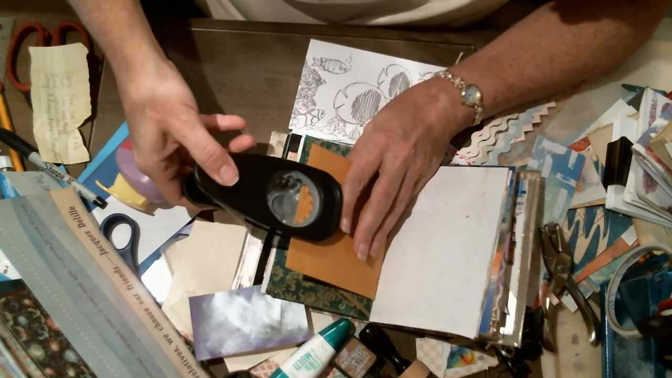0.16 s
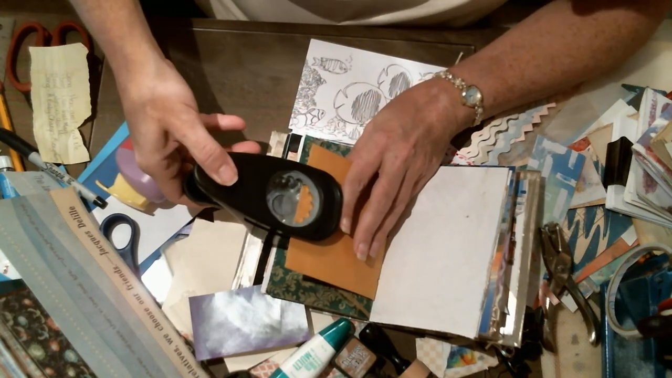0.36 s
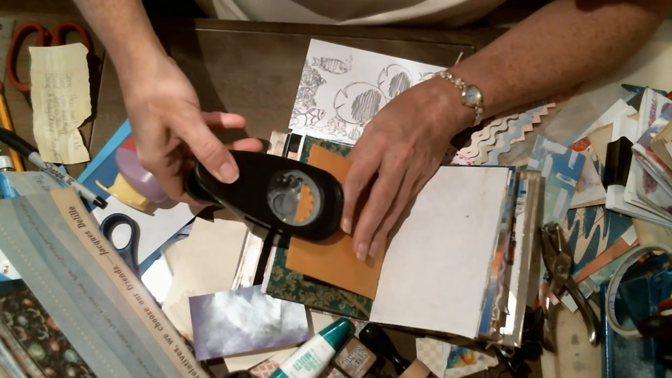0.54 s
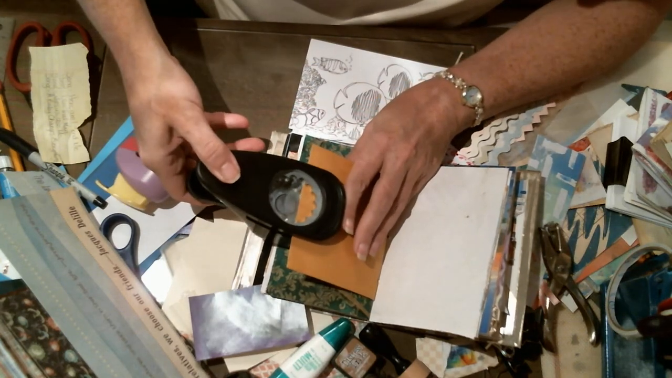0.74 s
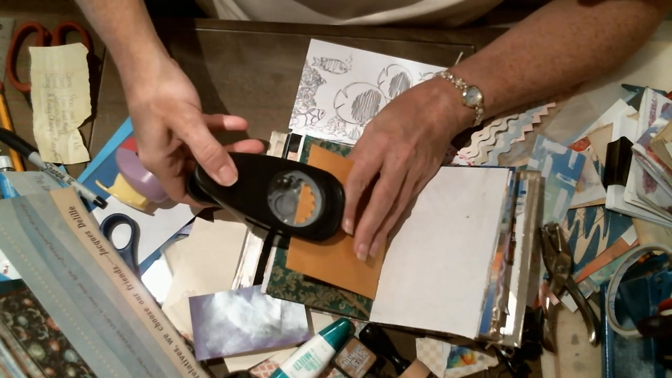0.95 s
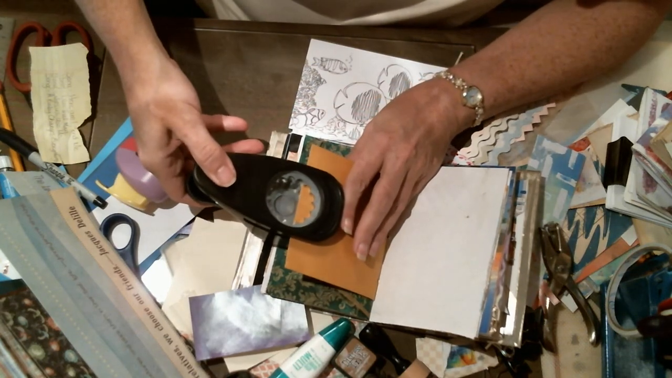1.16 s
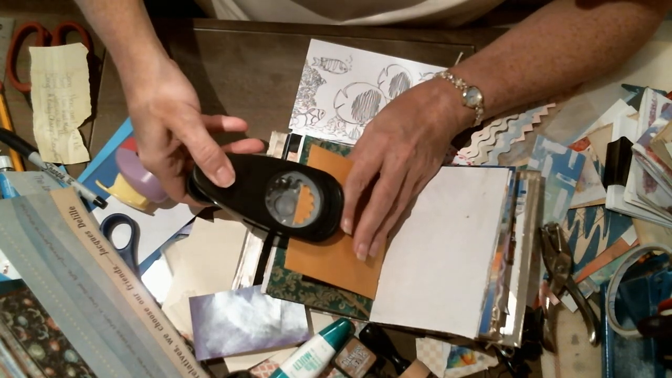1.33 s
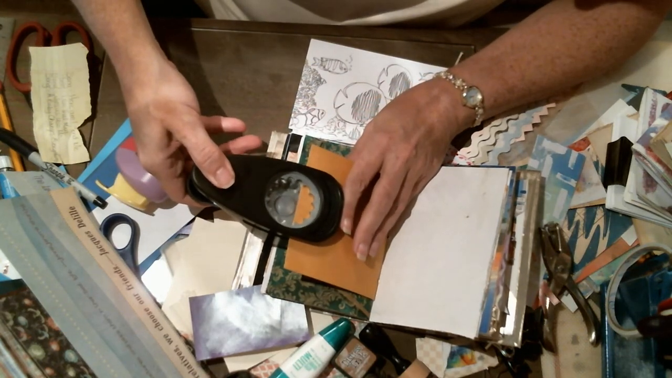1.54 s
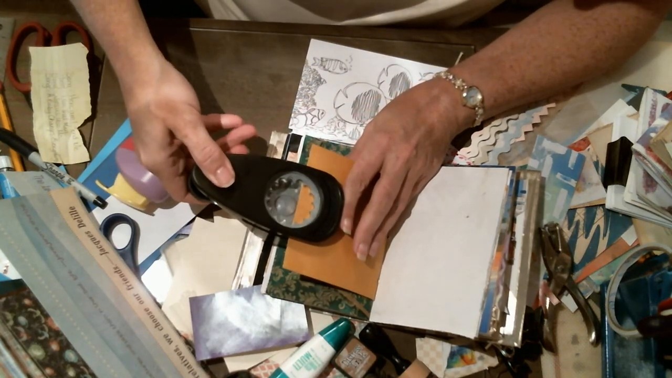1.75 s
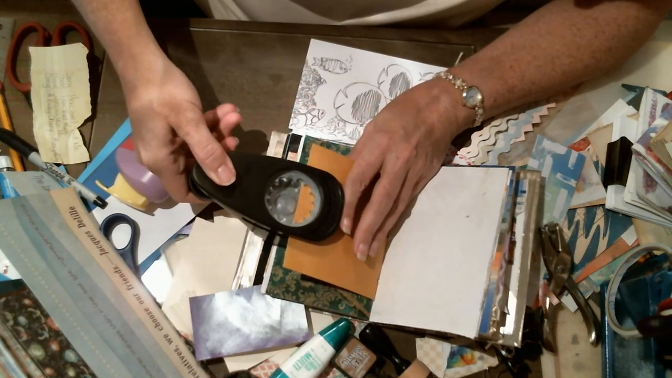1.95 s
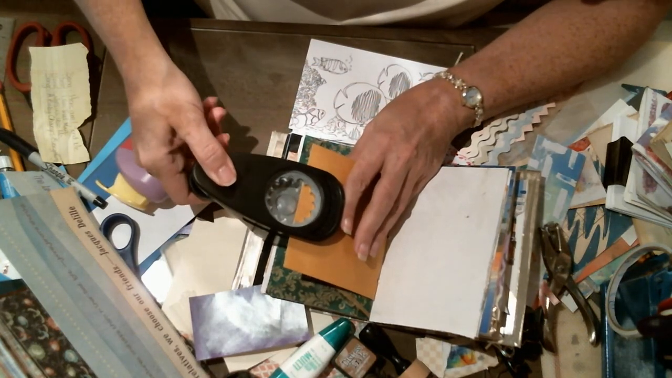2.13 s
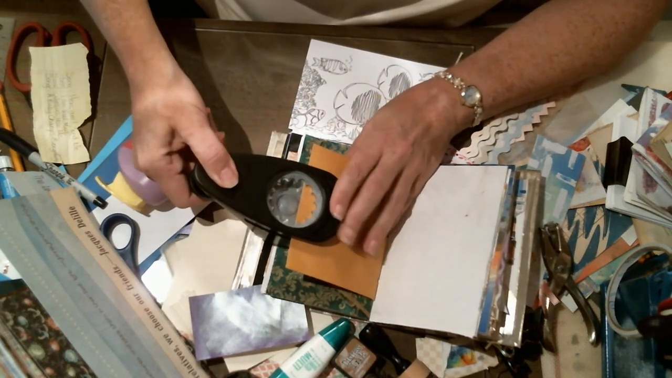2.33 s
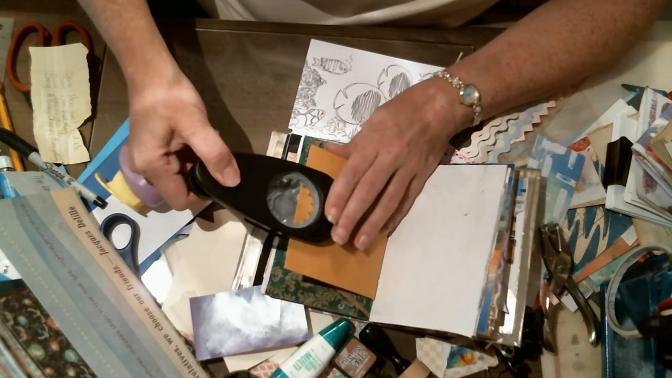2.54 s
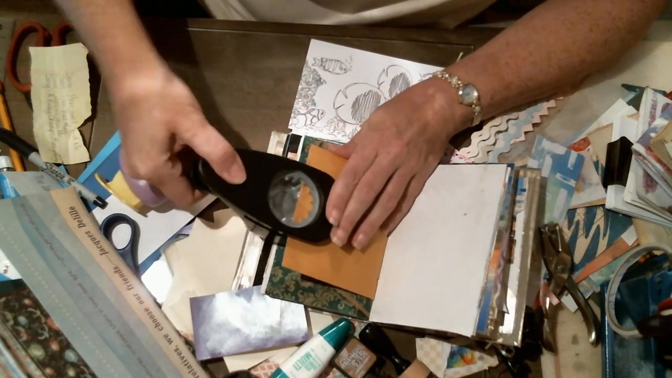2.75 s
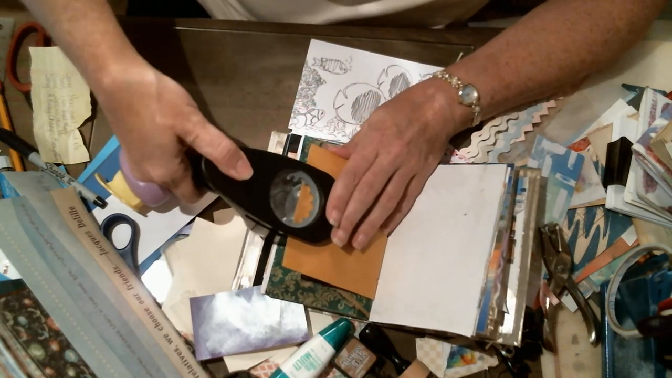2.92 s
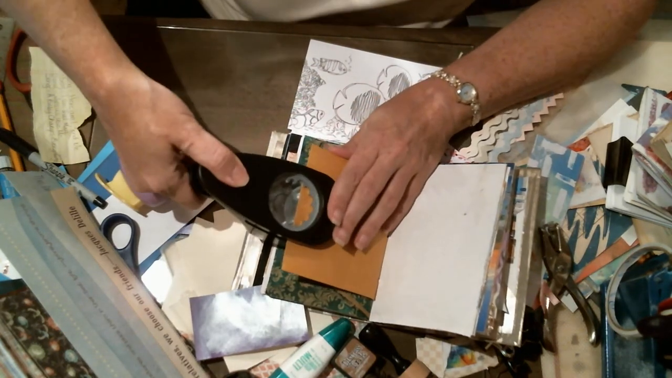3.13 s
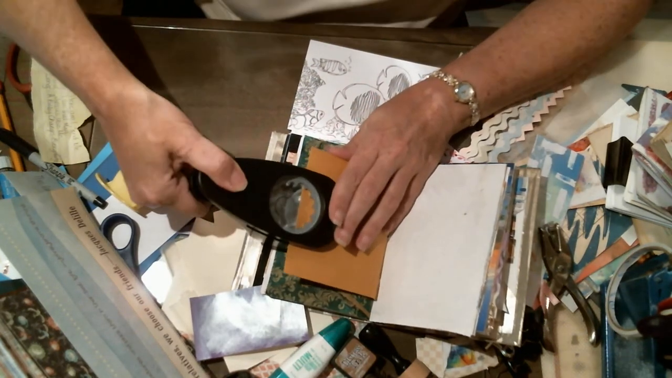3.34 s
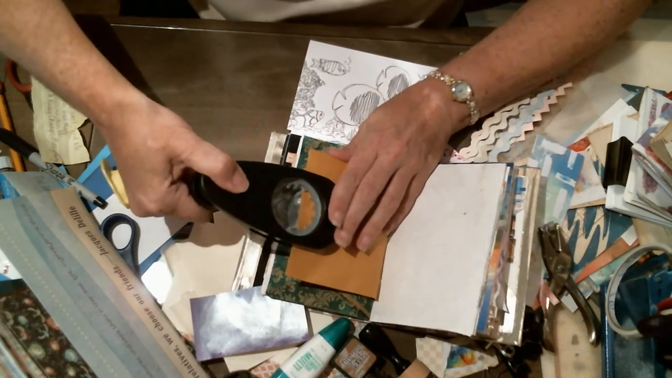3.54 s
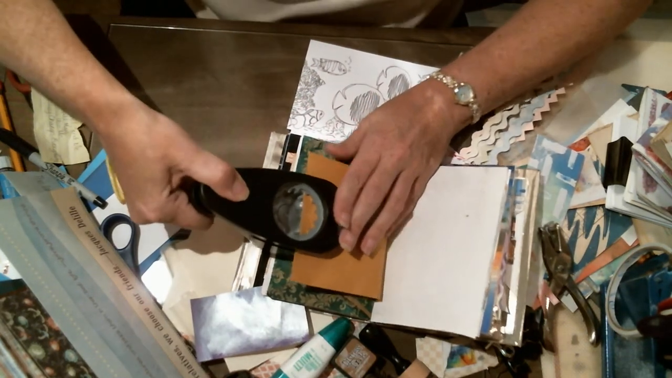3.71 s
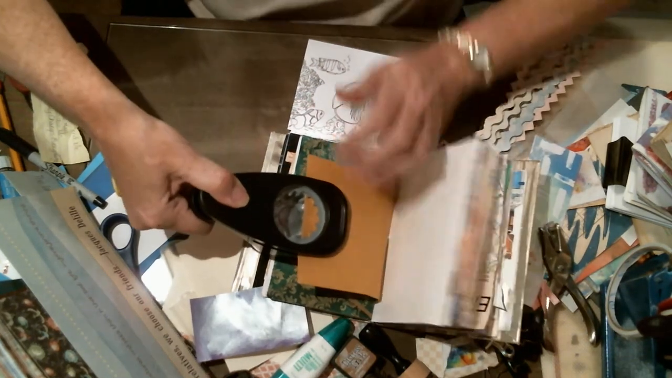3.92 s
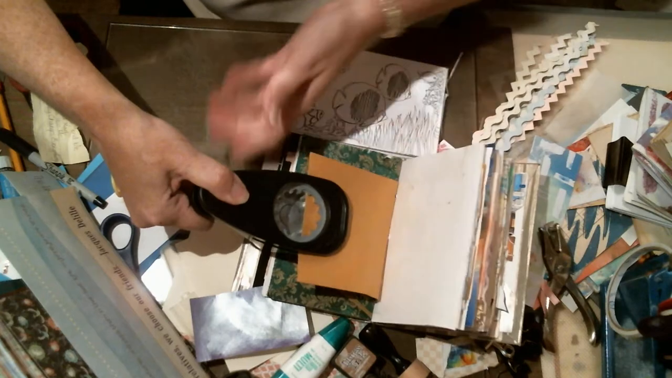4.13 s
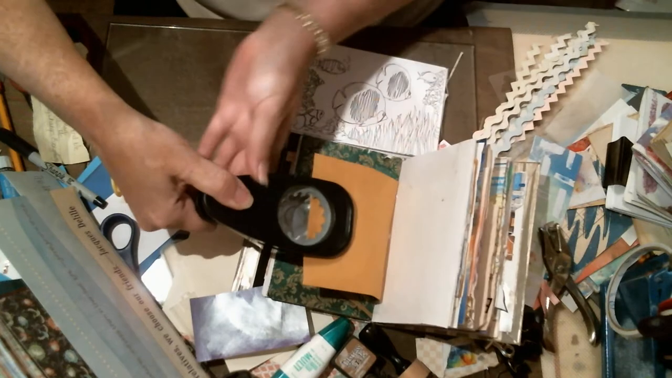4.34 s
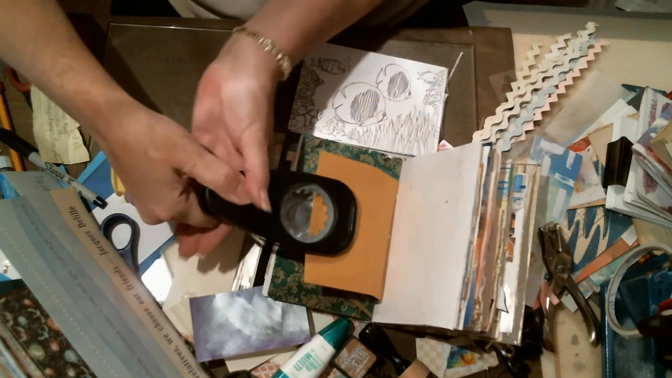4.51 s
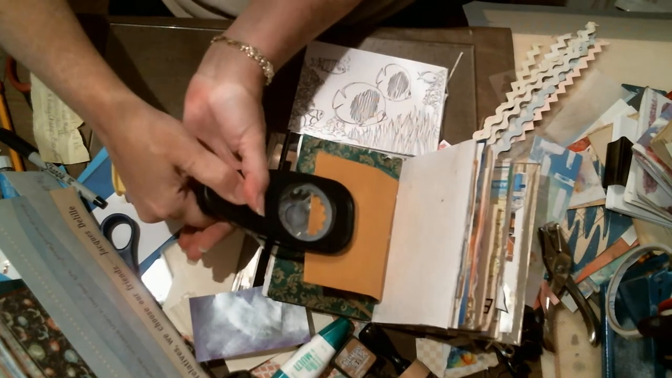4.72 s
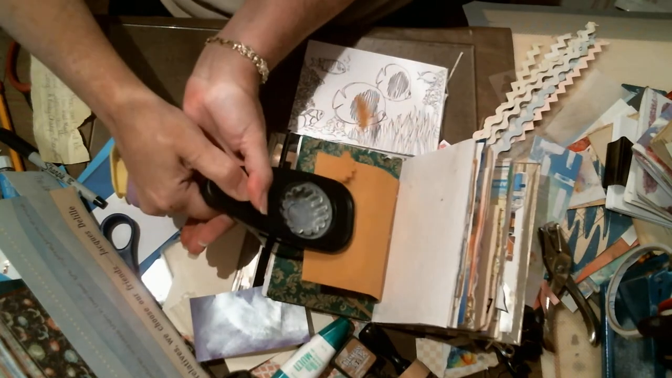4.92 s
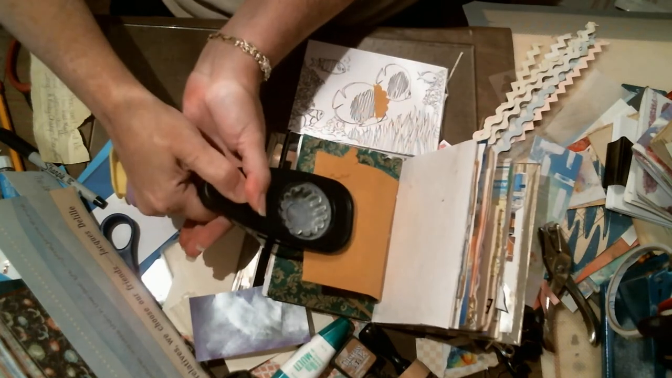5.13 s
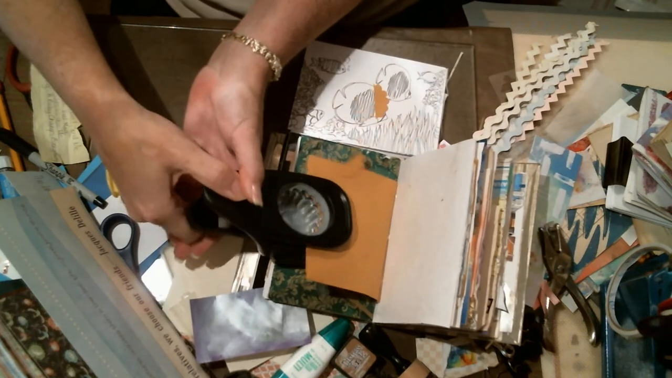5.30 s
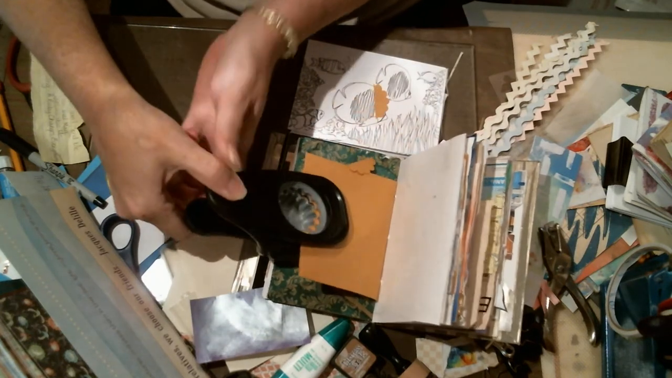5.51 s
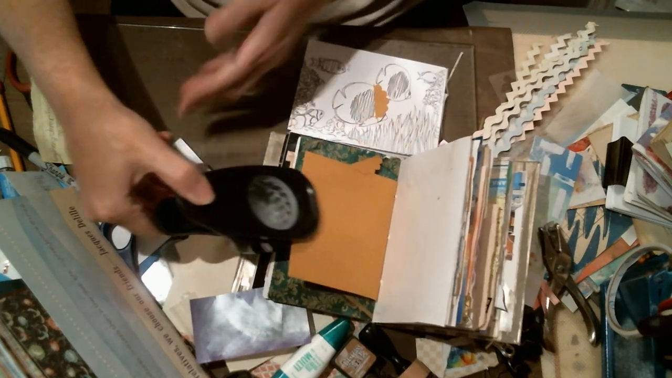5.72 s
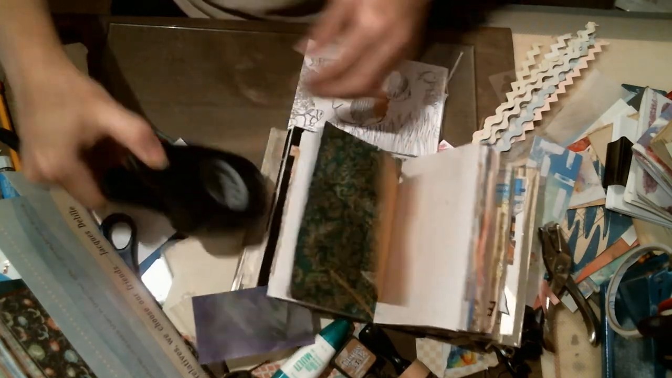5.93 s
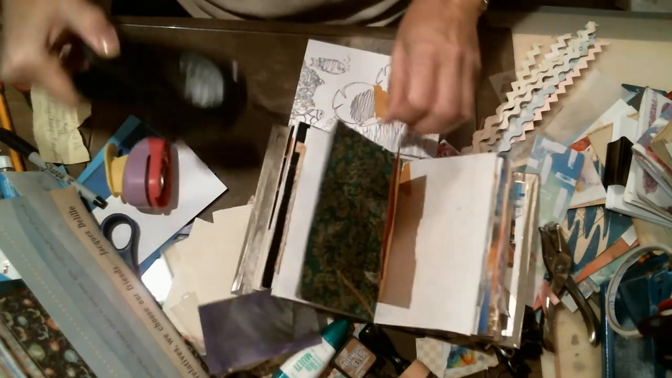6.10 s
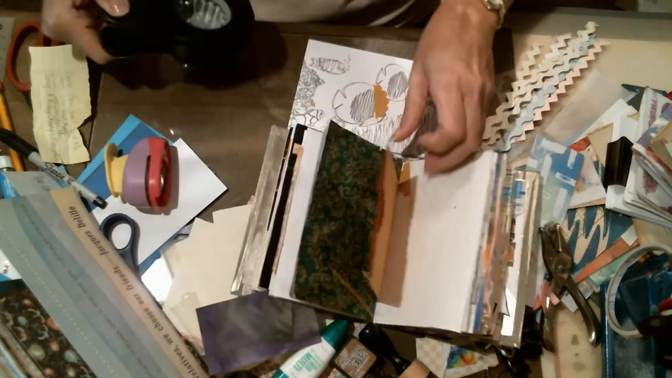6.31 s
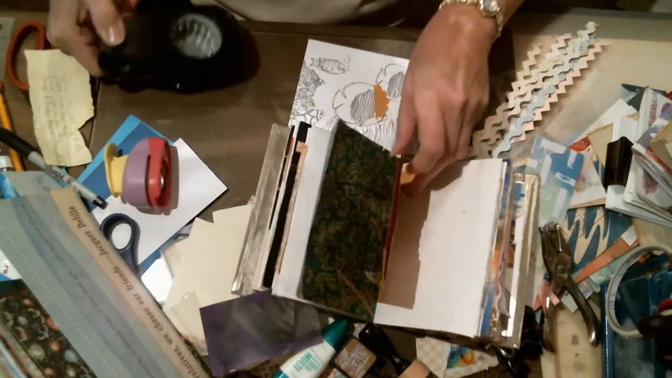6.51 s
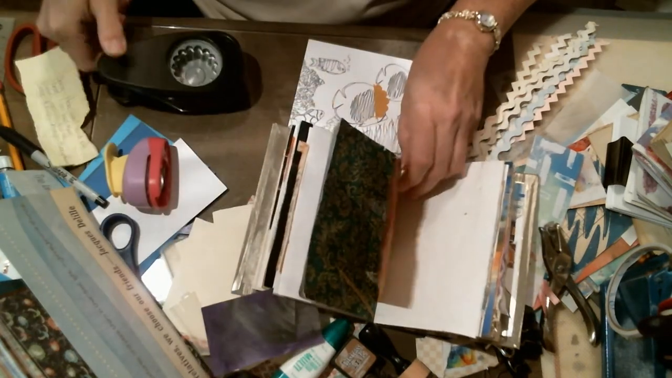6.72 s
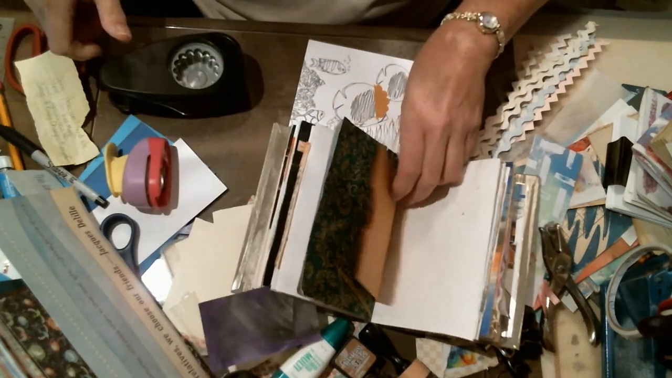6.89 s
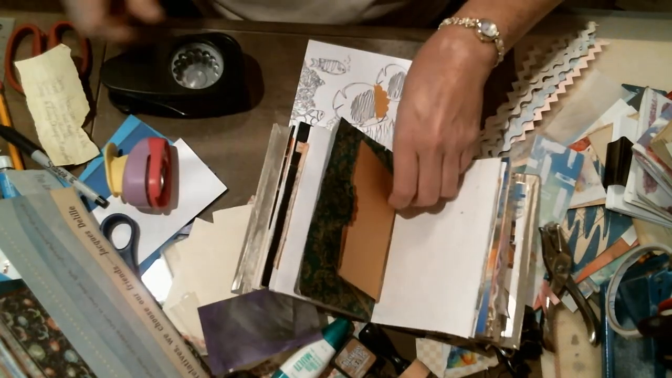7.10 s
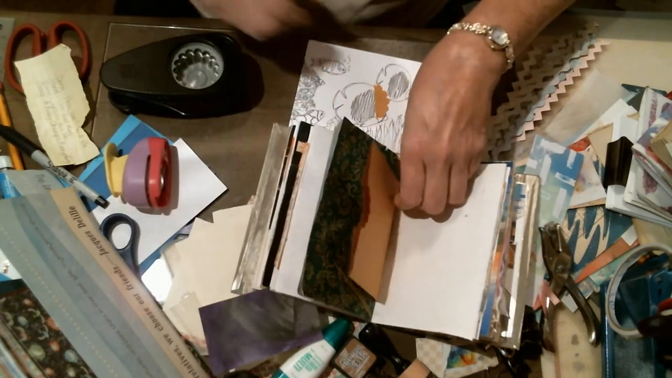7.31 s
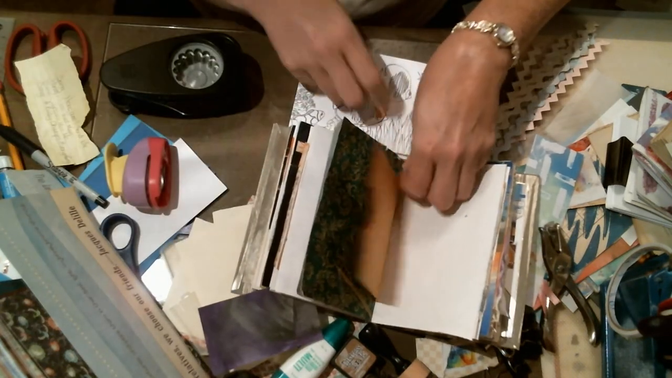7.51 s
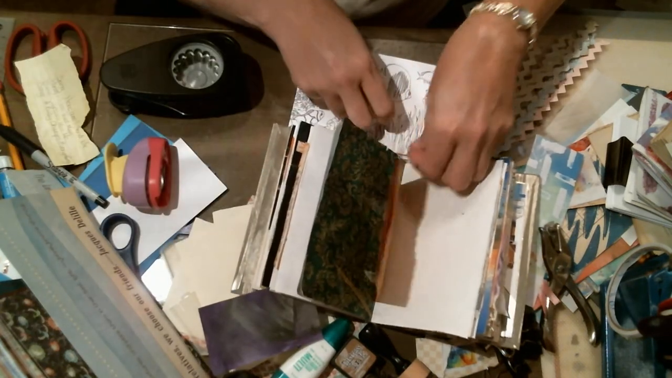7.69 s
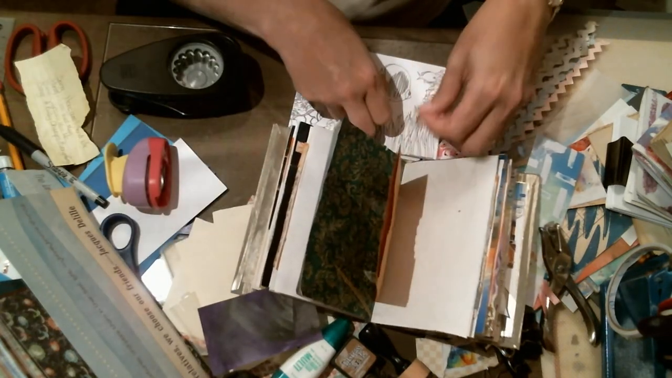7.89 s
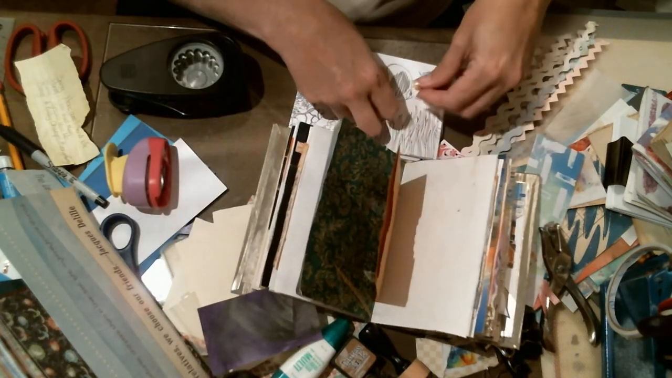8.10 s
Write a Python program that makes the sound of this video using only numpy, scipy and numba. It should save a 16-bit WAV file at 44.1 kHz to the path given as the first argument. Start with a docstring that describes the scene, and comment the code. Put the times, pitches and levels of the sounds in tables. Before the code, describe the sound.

Over a faint room hum, tiny steel ticks, a sharp plastic clack, a louder crunching snap, papery rubs, then thumps with a short judder.

```python
"""Faint steel ticks over a humming room, a jaw's clack, a loud snap, rubbing card, then thumps and a judder.
The place is a craft desk: a handheld plastic lever punch, its steel die slid onto thick card, bites through
it, is freed and put down, and rocks. Shaped noise makes the cracks, scrapes and rubs, damped sines the rings,
an uneven sawtooth the judder. Short reflections come from the cluttered desk.
The small narrow-band microphone has gain control and clips on overload."""
import sys
import numpy as np
from scipy import signal
from scipy.fft import rfft, irfft, next_fast_len
from scipy.io import wavfile
from scipy.ndimage import uniform_filter1d
from numba import njit

SR = 44100
rng = np.random.default_rng(int(sys.argv[2]) if len(sys.argv) > 2 else 0)


def generate_wav(signal):
    """Clip the signal to [-1, 1] and save it as 16-bit WAV at the path in sys.argv[1]."""
    frames = np.transpose(np.atleast_2d(signal))
    scaled = np.clip(frames, -1, 1) * 32767
    pcm = np.round(scaled).astype(np.int16)
    wavfile.write(sys.argv[1], SR, pcm)


N = 363869

# Levels are relative, before the room, gain control and microphone.
# Spectrum of the room air: (frequency [Hz], level [dB])
AIR_COLOUR = [(15, -55.5), (25, -19), (59, -3.5), (115, -6.5), (185, -7.5), (218, -0.5), (264, -17),
              (305, -10), (456, -9.5), (502, -15.5), (552, -19), (622, -13), (1080, -12), (4180, -23.5),
              (7400, -23), (9620, -58.5), (16300, -120)]
# Fan tones: (frequency [Hz], width [Hz], level [dB])
FAN_TONES = [(225.3, 15, -70), (464, 4, -78), (549, 5.8, -76)]
# The die and its spring tick: (time [s], level [dB], rise [s], finger grip [0-1], liveliest ring [Hz])
DIE_TICKS = [(0.984, -41.5, 0.015, 0, 6160), (1.709, -41.5, 0.025, 0.75, 4970),
             (1.725, -35, 0.005, 0.4, 4650), (1.739, -34, .005, .7, 7500), (2.012, -55.5, .002, 0.34, 5350),
             (2.5485, -32, 0.002, 0.1, 5400), (2.56, -35, 0.00033, 0.78, 6100),
             (4.246, -35.5, 0.0031, 0.89, 4470)]
# Free ring of the steel parts: (frequency [Hz], level [dB], t60 [s])
STEEL_RING = [(3320, -14, .1), (4450, -9, .09), (4728, -8, .2), (4800, -2, .07), (5285, -13, .16),
              (5908, -7, .27), (6227, -14, .25), (6505, -4, .09), (6770, -6, .11), (7250, -11, .13),
              (7400, -3, .09)]
# Ring of the housing round them: (frequency [Hz], level [dB], t60 [s])
HOUSING_RING = [(478.4, -17.5, 0.065), (540.7, -10.5, .1), (976, -2, 0.043), (1317, -5, 0.017),
                (1447, -2.5, 0.017), (2070, -8.5, 0.044), (2540, -17, 0.049), (3020, -7.5, 0.055),
                (3840, -10, 0.13)]
# Light knocks of the handled body: (time [s], level [dB], pitch of the touched spot [Hz])
BODY_KNOCKS = [(1.728, -46.5, 1397), (1.743, -45, 1412), (2.562, -41, 1300), (3.005, -30.5, 3006),
               (5.363, -48.5, 1282), (5.623, -60.5, 4474), (5.8304, -49, 2930), (5.9855, -36.5, 3857),
               (5.992, -33.5, 2460), (6.0164, -30.5, 5400), (6.5867, -31, 6900), (6.587, -45, 1810),
               (6.9384, -49.5, 4970), (6.972, -39.5, 6100), (7.395, -52, 1200), (7.401, -55, 2885)]
# Plastic body, damped by the hand: (frequency [Hz], level [dB], t60 [s])
BODY_RING = [(600, 0, 0.091), (1300, -1.5, 0.078), (1840, -6.5, .07), (2050, -4.5, .08), (2305, -1, 0.091),
             (2830, -2.5, .045), (3244, -2.5, 0.11), (3940, -1, 0.021), (4040, -3, .07), (4880, 2.5, .08),
             (5625, 1.5, 0.02), (5400, 4.5, 0.027), (6300, -3, .06), (7850, 4.5, .06)]
# The jaw closes on the card: (time [s], level [dB], t60 [s], contact cut-off [Hz])
JAW_CONTACTS = [(2.1733, -7.5, 0.018, 2769), (2.1752, -6, 0.014, 6870)]
# Spectrum of the jaw's crack: (frequency [Hz], level [dB])
JAW_SPECTRUM = [(40, -25), (550, -24.5), (900, -2), (1450, -3), (1750, -10), (2300, -3.5), (3500, -12.5),
                (5000, -6.5), (5600, -11.5), (6700, -4.5), (7500, -10.5)]
# Ring of the lever: (frequency [Hz], level [dB], t60 [s])
LEVER_RING = [(340, -38, .09), (912, -12, .037), (1005, -15, .047), (1130, -18, .04), (1300, -17, .035),
              (1435, -24, .16), (1490, -16, .055), (2017, -16, .042), (2445, -20, .085), (2582, -26, .11),
              (5960, -36, .19), (6750, -32, .17)]
# Card rubs on the die and on the pages: (time [s], level [dB], rise [s], tilt [dB per octave])
CARD_RUBS = [(3.774, -61, 0.018, 10), (5.15, -48.5, 0.057, -1.5), (5.229, -30.5, 0.004, -4.5),
             (5.25, -36.5, 0.0024, -6.5), (5.585, -52, 0.038, 2), (5.996, -38, 0.019, -7),
             (6.956, -44, 0.0081, 1), (7.281, -58.5, 0.034, 20), (7.361, -44.5, 0.021, 6.5),
             (7.425, -46, 0.0071, 15)]
# Spectrum of rubbed card: (frequency [Hz], level [dB])
CARD_SPECTRUM = [(400, -43.5), (1000, -29), (1800, -10.5), (2900, -14.5), (3400, -2), (4700, 2.5),
                 (5500, 1), (7400, 10)]
# The die breaks through, bottoms out and chatters: (time [s], level [dB], t60 [s], contact cut-off [Hz])
SNAP_CONTACTS = [(4.791, -36.5, 0.18, 131), (4.8058, -4, 0.023, 8900), (4.8092, -1, 0.025, 1800),
                 (4.8148, -4.5, 0.048, 6000), (4.8208, -12.5, 0.12, 8050), (4.8287, -16, 0.071, 7900)]
# Spectrum of the die's crack: (frequency [Hz], level [dB])
SNAP_SPECTRUM = [(30, -15), (130, -14), (320, -4.5), (560, -4), (700, -9.5), (950, -3), (1400, -4),
                 (2100, 0.5), (2900, -1.5), (5500, 1), (7000, 6.5), (7500, -2)]
# Ring of the loaded frame: (frequency [Hz], level [dB], t60 [s])
FRAME_RING = [(42, -13, .09), (75, -15, .06), (155, -11, .05), (295, -12, .055), (560, -11, .07),
              (895, -4, .055), (1064, -6, .06), (1240, -16, .055), (1533, -25, .19), (1713, -17, .11),
              (1867, -24, .14), (2050, -17, .07), (2170, -18, .06), (2540, -36, .38), (4030, -26, .15),
              (4594, -32, .21), (6460, -28, .2), (6790, -29, .27)]
# The punch lands and rocks: (time [s], force [dB], lower edge of the bass [Hz], shell ring [dB])
DESK_LANDINGS = [(6.4836, -3, 200, -30), (6.706, -2, 70, 0.5), (6.7082, -5.5, 200, -12),
                 (6.744, -14, 200, 1), (6.763, -14, 200, -5), (6.774, -20, 200, -9)]
# Spectrum of the crack of landing: (frequency [Hz], level [dB])
LANDING_SPECTRUM = [(35, -0.5), (130, 1.5), (300, 1.5), (800, -5), (1200, -3.5), (1950, -10), (2450, -0.5),
                    (3100, -12), (3700, -4.5), (4700, -5), (5700, -10.5), (6900, -3.5), (7500, -8)]
# Ring of the desk top: (frequency [Hz], level [dB], t60 [s])
DESK_RING = [(55, -17.5, 0.23), (90, -28, 0.037), (139, -24.5, 0.13), (154, -8.5, 0.064),
             (223.3, -17.5, 0.18), (265.7, -19, .11), (410, -28, 0.13), (580, -22, .03)]
# Ring of the hollow shell: (frequency [Hz], level [dB], t60 [s])
SHELL_RING = [(1065, -26, .04), (1376, -19, .05), (1397, -47, .42), (1510, -13, .03), (1587, -13, .05),
              (2440, -22, .04), (2782, -52, .5), (3080, -23, .025), (6482, -40, .22)]
# The foot judders over the desk between landings: (time [s], length [s], level [dB])
FOOT_SKIDS = [(6.604, .039, -39), (6.658, .042, -46.5)]

BAND_HZ = 7560  # upper edge of the microphone's band
T = np.arange(SR * 3 // 5) / SR  # clock of one short sound [s]


def undb(db):
    """Decibels to gain."""
    return 10 ** (np.asarray(db) / 20)


def unit(x):
    """Scale to rms 1."""
    return x / np.sqrt(np.mean(x ** 2))


def add(track, s, sound):
    """Mix a sound in at time s [s]."""
    i = int(s * SR)
    track[i:i + len(sound)] += sound[:N - i]


def fade(t60):
    """Exponential decay that loses 60 dB in t60 [s]."""
    return np.exp(-np.log(1000) * T / t60)


def swell(rise, t60, hold=0):
    """A linear rise, then a free decay that starts at the later of rise and hold [s]."""
    decay_start = max(rise, hold)
    return np.minimum(T / rise, 1) * np.exp(-np.log(1000) * np.maximum(T - decay_start, 0) / t60)


def shape(x, gain_at):
    """Causal (minimum-phase) filter with gain gain_at(Hz), scaled to keep the power of white noise."""
    size = 2 * next_fast_len(len(x))
    hz = np.maximum(np.fft.rfftfreq(size, 1 / SR), 1)
    band_limit = np.sqrt(1 + (hz / (BAND_HZ * 1.1)) ** 40)
    gain = unit(gain_at(hz) / band_limit) + 1e-5  # the floor keeps the logarithm finite
    # Folding the cepstrum forward in time makes the filter causal.
    cepstrum = irfft(np.log(gain))
    cepstrum[1:size // 2] *= 2
    cepstrum[size // 2 + 1:] = 0
    return irfft(rfft(x, size) * np.exp(rfft(cepstrum)))[:len(x)]


def colour(points, hz):
    """Gain of a (frequency [Hz], level [dB]) spectrum, drawn straight over log frequency."""
    f, db = np.transpose(points)
    return undb(np.interp(np.log(hz), np.log(f), db))


def resonance(hz, centre, width):
    """Gain of one band-pass resonance."""
    return 1 / np.hypot(1, (hz ** 2 - centre ** 2) / (hz * width))


def through(hz, modes, width):
    """Gain of a part that passes sound mainly near its modes."""
    power = sum((undb(db) * resonance(hz, f, width) ** 2) ** 2 for f, db, _ in modes)
    return np.sqrt(power)


def crackle(envelope):
    """Noise under an envelope, its spectrum evened out, like a dense run of micro-impacts."""
    size = 2 * len(envelope)
    spectrum = rfft(rng.standard_normal(len(envelope)) * envelope, size)
    spectrum /= np.sqrt(uniform_filter1d(abs(spectrum) ** 2, size=500))
    return unit(irfft(spectrum)[:len(envelope)]) * np.sqrt(np.mean(envelope ** 2))


def ring(modes, rise=0.00013, scatter_db=1, weight=lambda hz: 1):
    """Damped modes, weighted by the place of the blow, with chance levels and signs for each blow."""
    out = np.zeros(len(T))
    for hz, db, t60 in modes:
        chance, sign = rng.standard_normal(2)
        level = weight(hz) * undb(db + scatter_db * chance) * np.sign(sign)
        out += level * swell(rise, t60) * np.sin(2 * np.pi * hz * T)
    return out


def room(x, first_s=0.0047, t60_s=0.13, level_db=-6.5, low_hz=260):
    """Dense, short reflections from the cluttered desk; such small surfaces return little bass."""
    envelope = swell(first_s, t60_s) * (T > first_s / 2)
    tail = shape(crackle(envelope), lambda hz: hz / np.hypot(hz, low_hz))
    tail *= np.sqrt(2 * BAND_HZ / SR) / np.linalg.norm(tail)  # unit gain within the band
    return x + undb(level_db) * signal.fftconvolve(x, tail)[:len(x)]


def background(air_db=-60.5, mains_hz=122, mains_db=-70):
    """Steady room air as shaped noise, mains hum as a sine, wavering fan tones as narrow noise."""
    out = undb(air_db) * shape(rng.standard_normal(N), lambda hz: colour(AIR_COLOUR, hz))
    for centre, width, db in FAN_TONES:
        tone = shape(rng.standard_normal(N), lambda hz: resonance(hz, centre, width) ** 2)
        out += undb(db) * unit(tone)
    mains = unit(np.sin(2 * np.pi * mains_hz * np.arange(N) / SR))
    return out + undb(mains_db) * mains


def ticks():
    """Steel drags on steel, rings and knocks the housing; a firmer grip scrapes more and damps the ring."""
    scrape_t60, scrape_db, scrape_width_hz = .06, 2.5, 380  # scrape level at full grip
    grip_t60, lively_width_hz = .11, 2400  # extra damping [s] of a full grip; width of the lively region
    housing_db, housing_lag_s, housing_response_s = 1.5, 0.00043, 0.0017
    out = np.zeros(N)
    for s, db, rise, grip, lively_hz in DIE_TICKS:
        scrape = shape(crackle(swell(rise, scrape_t60)),
                       lambda hz: through(hz, STEEL_RING, scrape_width_hz))
        scrape = grip * undb(scrape_db) * room(scrape)
        steel = ring(STEEL_RING, rise, weight=lambda hz: resonance(hz, lively_hz, lively_width_hz))
        steel *= fade(grip_t60) ** (grip ** 2)
        # The heavier plastic responds later, and less to a slow tick.
        housing = ring(HOUSING_RING, rise + housing_lag_s) / (1 + (rise / housing_response_s) ** 2)
        add(out, s, undb(db) * (steel + scrape + undb(housing_db) * housing))
    return out


def knocks(rise=.0008, rattle_t60=.04, mode_width_hz=200):
    """A short rattle passes body modes near the touched spot's pitch; soft, low knocks mostly ring."""
    middle_hz, middle_width_hz, width_growth = 3000, 540, 1.8  # width grows as this power of pitch
    # Ring offset [dB], ring dB per dB of rattle, and ring dB per octave of pitch.
    ring_offset_db, ring_growth, ring_db_per_octave = -28, 0.47, -2
    out = np.zeros(N)
    for s, db, centre in BODY_KNOCKS:
        width = middle_width_hz * (centre / middle_hz) ** width_growth

        def spot(hz):
            return resonance(hz, centre, width)

        rattle = shape(crackle(swell(rise, rattle_t60)),
                       lambda hz: spot(hz) * through(hz, BODY_RING, mode_width_hz))
        ring_db = ring_offset_db + ring_growth * db + ring_db_per_octave * np.log2(centre / middle_hz)
        body = undb(ring_db) * ring(BODY_RING, 2 * rise, weight=spot)
        add(out, s, undb(db) * room(rattle) + body)
    return out


def stroke(contacts, spectrum, modes):
    """Contacts in quick succession crack the plastic; the hardest sets the modes ringing."""
    out = np.zeros(N)
    for s, db, t60, cut_hz in contacts:
        crack = shape(crackle(fade(t60)),
                      lambda hz: colour(spectrum, hz) / np.hypot(1, (hz / cut_hz) ** 2))
        add(out, s, undb(db) * room(crack))
    hardest = max(contacts, key=lambda row: row[1])
    add(out, hardest[0], ring(modes))
    return out


def jaw_clack():
    """The jaw shuts on the card in two contacts and the lever rings."""
    return stroke(JAW_CONTACTS, JAW_SPECTRUM, LEVER_RING)


def rubs(grain_db=3, patch_width_hz=120, patch_count=22):
    """Card fibres catch and let go in uneven grains; each rub is patchy in pitch, in randomly drawn bands."""
    sudden_t60, linger = 0.11, 2.2  # t60 [s] of a sudden rub; extra seconds per second of rise
    out = np.zeros(N)
    for s, db, rise, tilt_db in CARD_RUBS:
        bursts = undb(grain_db * rng.exponential(size=len(T))) ** 2
        grains = unit(uniform_filter1d(bursts, size=40))
        envelope = swell(rise, sudden_t60 + linger * rise)
        rub = crackle(envelope * np.sqrt(grains / np.median(grains)))
        # One narrow band falls at random within each equal slice of the spectrum.
        patch_hz = (np.arange(patch_count) + rng.random(patch_count)) * BAND_HZ / patch_count

        def patchy_card(hz):
            patches = sum(resonance(hz, f, patch_width_hz) ** 2 for f in patch_hz)
            octaves = np.log2(np.maximum(hz, CARD_SPECTRUM[0][0]) / BAND_HZ)
            return patches * colour(CARD_SPECTRUM, hz) * undb(tilt_db * octaves)

        add(out, s, undb(db) * room(shape(rub, patchy_card)))
    return out


def die_snap():
    """The die breaks through, bottoms out and chatters, and the loaded frame rings."""
    return stroke(SNAP_CONTACTS, SNAP_SPECTRUM, FRAME_RING)


def landings(crack_t60=0.012, crack_db=3.5, crack_growth=1.76):
    """Each landing cracks, thumps the desk and rings the shell; a glancing one lacks the deep bass."""
    out = np.zeros(N)
    for s, force_db, low_hz, shell_db in DESK_LANDINGS:
        def bass(hz):
            return 1 / np.hypot(1, (low_hz / hz) ** 2)

        crack = shape(crackle(fade(crack_t60)),
                      lambda hz: colour(LANDING_SPECTRUM, hz) * np.sqrt(bass(hz)))
        # The crack falls faster than the force, so a soft landing hardly cracks.
        crack = undb(crack_db + crack_growth * force_db) * room(crack)
        thud = undb(force_db) * ring(DESK_RING, weight=bass)
        shell = undb(shell_db) * ring(SHELL_RING, rise=0.0026)
        add(out, s, crack + thud + shell)
    return out


def skid(jitter=.16, rise_s=.005, t60=.03):
    """Stick and slip: a slowing, uneven sawtooth force, dulled by the desk."""
    slip_hz, slowing_s = 242, .14  # mean slip rate at the first skid's start; time constant of slowing
    softness = 1.8  # the desk dulls the judder above this multiple of the slip rate
    out = np.zeros(N)
    for s, length, db in FOOT_SKIDS:
        elapsed = s - FOOT_SKIDS[0][0] + np.minimum(T, length)
        rate = slip_hz * np.exp(-elapsed / slowing_s)
        uneven = 1 + jitter * unit(uniform_filter1d(rng.standard_normal(len(T)), size=200))
        force = np.cumsum(rate * uneven) / SR % 1 - .5
        soft_hz = softness * rate[0]
        body = shape(force, lambda hz: 1 / np.hypot(1, hz / soft_hz)
                     / np.hypot(1, (hz / soft_hz / 2) ** 6))
        pressure = swell(rise_s, t60, hold=length)
        add(out, s, undb(db) * unit(body) * pressure)
    return out


def scene():
    """Punch, card and desk over the room air, as one channel."""
    handling = ticks() + knocks() + rubs()
    punching = jaw_clack() + die_snap()
    putting_down = landings() + skid()
    return (background() + handling + punching + putting_down)[None]


@njit
def follow(x, attack, release):
    """Level follower that rises fast and sinks slowly."""
    out, level = np.empty(len(x)), 0.
    for i in range(len(x)):
        target = abs(x[i])
        level += (target - level) * (attack if target > level else release)
        out[i] = level
    return out


def record(dry, attack_s=.03, release_s=0.39, duck=7, top_hz=15800):
    """Gain control ducks after loud blows; the voice-band microphone cuts the treble and clips."""
    level = follow(dry[0], 1 / (attack_s * SR), 1 / (release_s * SR))
    gain = 1 / np.sqrt(1 + duck * level)
    voice_band = signal.ellip(12, .3, 70, BAND_HZ, fs=SR, output="sos")
    clipped = np.clip(signal.sosfilt(voice_band, dry * gain), -1, 1)
    # A second low-pass limits the treble that clipping adds.
    return signal.sosfilt(signal.ellip(8, .2, 70, top_hz, fs=SR, output="sos"), clipped)


dry = scene()
out = record(dry)
generate_wav(out)
```